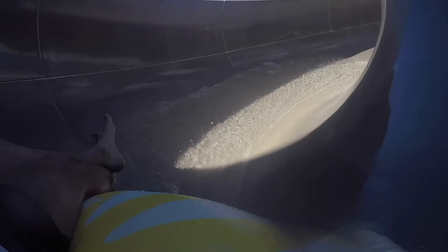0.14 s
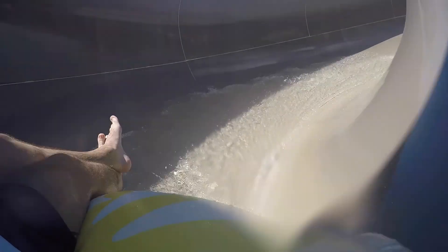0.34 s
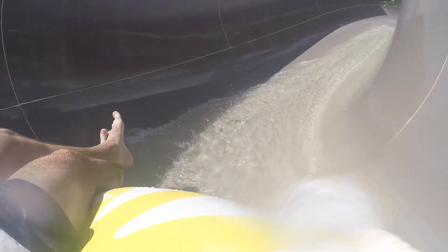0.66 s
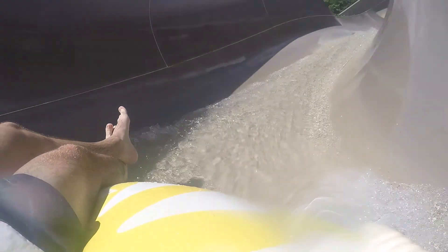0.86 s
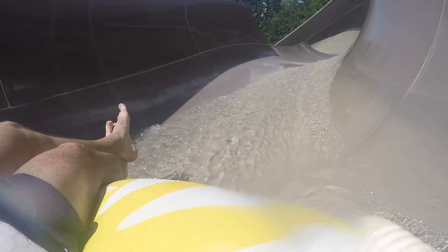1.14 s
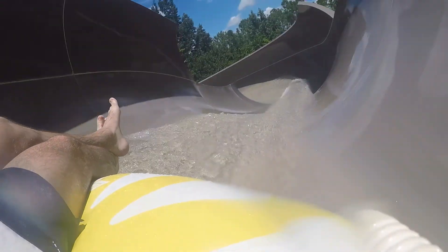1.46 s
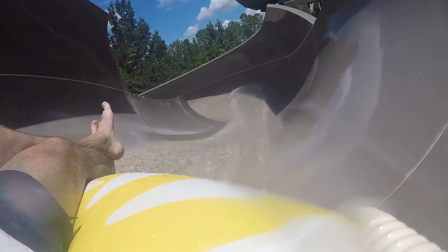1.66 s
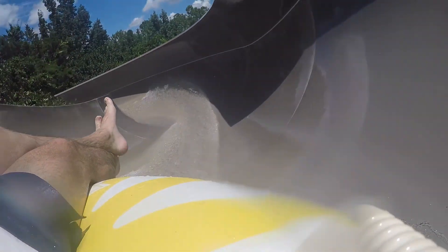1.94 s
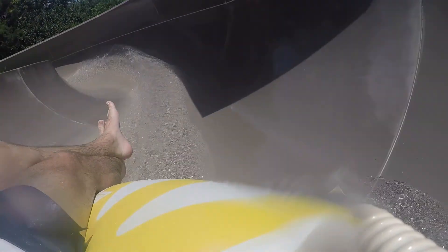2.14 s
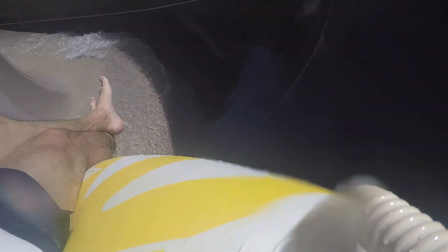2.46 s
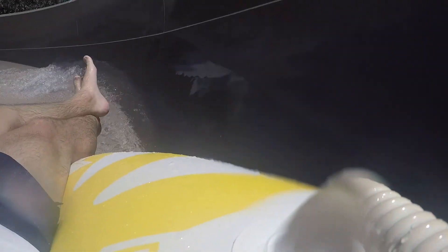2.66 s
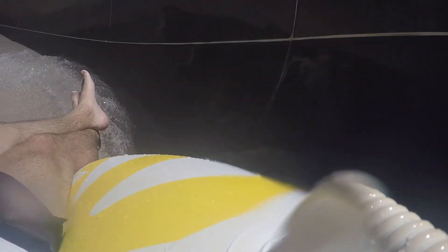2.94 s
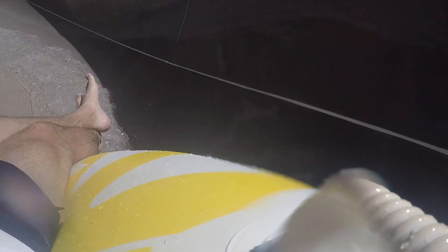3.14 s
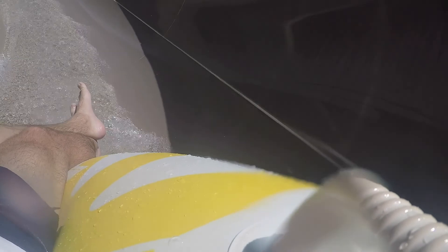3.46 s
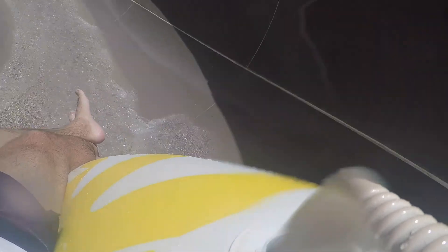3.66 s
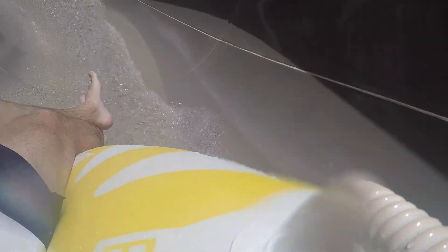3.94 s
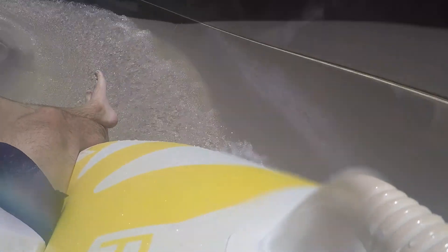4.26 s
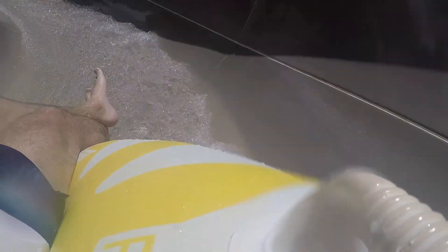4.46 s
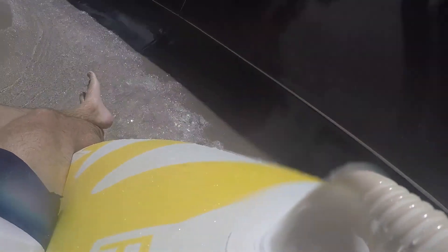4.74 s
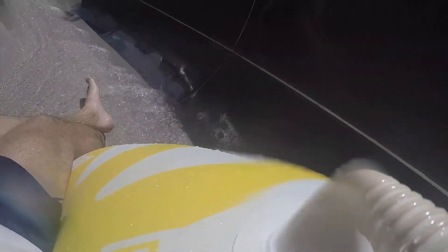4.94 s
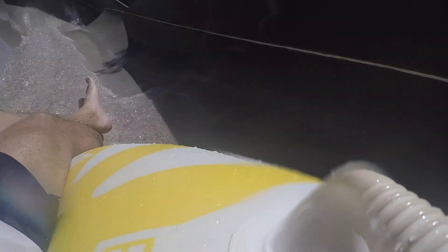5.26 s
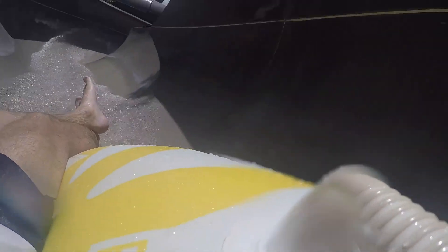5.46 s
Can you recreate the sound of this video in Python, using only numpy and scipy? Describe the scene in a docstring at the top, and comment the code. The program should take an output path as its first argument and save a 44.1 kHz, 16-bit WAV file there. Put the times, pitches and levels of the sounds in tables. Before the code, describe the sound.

Water rushes and splashes close up around an inflatable tube that rumbles and thumps down a water slide.

```python
"""Water rushing down a slide under an inflatable tube, heard close up from a camera riding on board.
Countless droplets and bubbles ring the flume and the waterproof case around the microphone, and the
water churns harder through a banked turn. The tube booms over the joints of the slide and sways after
each. Drops tick against the case, water slaps, and now and then comes a knock or the plop of an air pocket."""
import sys
import numpy as np
from scipy import signal
from scipy.fft import rfft, irfft
from scipy.io import wavfile
from scipy.ndimage import uniform_filter1d

SR = 44100
rng = np.random.default_rng(int(sys.argv[2]) if len(sys.argv) > 2 else 0)


def pcm_store(signal):
    """Save signal as 16-bit PCM."""
    levels = np.round(np.clip(np.atleast_2d(signal), -1, 1) * 32767)
    wavfile.write(sys.argv[1], SR, levels.astype(np.int16).T)


N = 246519
TIME = np.arange(N) / SR
FREQS = np.maximum(np.linspace(0, SR / 2, 8193), 1)

# the tube crossing the joints of the slide: start_s, level_db, start_pitch_hz, fade_s, sway_db
JOINT_BUMPS = [(.389, -24.5, 80, 0.062, -24), (0.848, -24.5, 83, 0.055, -40), (1.331, -23, 83, 0.06, -33.5),
               (2.304, -23, 71, 0.088, -24), (2.589, -19.5, 104, 0.021, -21.5),
               (3.059, -26, 58.7, .04, -14), (3.451, -21, 79, 0.02, -20), (3.527, -23, 92, 0.028, -31),
               (3.883, -24, 101.6, 0.097, -21.5), (4.297, -14.5, 99, 0.039, -23),
               (4.374, -28, 105, 0.012, -25), (4.729, -22.5, 99, 0.034, -25.5),
               (5.216, -15.5, 101, 0.075, -24)]
# resonances of case and flume rung by spray: pitch_hz, width_hz, gain_db
SPRAY_MODES = [(4450, 640, -1), (5720, 780, 5.5), (6260, 330, 3.5), (7340, 1330, -0.5), (8540, 600, -9),
               (11900, 4400, -15.5), (14500, 2700, -24)]
# higher resonances rung by fine mist: pitch_hz, width_hz, gain_db
MIST_MODES = [(7700, 850, -3.5), (8800, 900, -8), (9550, 1000, 0.5), (10400, 670, -5.5), (12500, 1800, -21),
              (14500, 1300, -19)]


def undb(db):
    """Decibels to gain."""
    return 10 ** (np.asarray(db) / 20)


def unit(x):
    """Scale to rms 1."""
    return x / np.sqrt(np.mean(x ** 2))


def add(track, start_s, sound):
    """Mix a sound in at its start time."""
    start = max(int(start_s * SR), 0)
    track[start:start + len(sound)] += sound[:max(N - start, 0)]


def wander(rate_hz):
    """Smooth random drift of rms 1 that changes about rate_hz times a second."""
    size = max(int(SR / rate_hz), 2)
    drift = uniform_filter1d(rng.standard_normal(N), size, mode="wrap")
    return unit(uniform_filter1d(drift, size // 2, mode="wrap"))


def swell(crest_s, level_db, rise_s, fall_s):
    """Power of a swell that builds to its crest and dies away."""
    early, late = np.maximum(crest_s - TIME, 0), np.maximum(TIME - crest_s, 0)
    return (undb(level_db) * np.exp(-(early / rise_s) ** 2 - late / fall_s)) ** 2


def slope(points):
    """Gain at every frequency from points of frequency_hz, gain_db."""
    hz, db = np.transpose(points)
    return undb(np.interp(np.log(FREQS), np.log(hz), db))


def resonances(modes):
    """Gain at every frequency of a set of steep resonances."""
    return np.sqrt(sum(undb(db) ** 2 / (1 + ((FREQS - hz) / width) ** 2) ** 4 for hz, width, db in modes))


def colour(x, gain):
    """Causal filter with the given gain, so that each click rings after it lands."""
    cepstrum, half = irfft(np.log(gain + 1e-9)), len(gain) - 1
    cepstrum[1:half] *= 2
    cepstrum[half + 1:] = 0
    impulse_response = irfft(np.exp(rfft(cepstrum)))[:half]
    return signal.fftconvolve(x, impulse_response)[:N]


def flow():
    """Rush of running water, churn under the tube and fine spray, in dB above their averages."""
    # the water along the ride: time_s, rush_db, churn_db, spray_db
    ride = [(0.0, -36.5, -46.5, -47), (0.04, -38, -44, -53.5), (0.59, -39, -46.5, -53.5),
            (0.98, -42, -48.5, -54.5), (1.09, -45, -48.5, -57), (1.37, -41, -45.5, -58),
            (1.91, -39.5, -46.5, -56.5), (2.29, -39, -40.5, -54.5), (2.32, -35.5, -37, -48),
            (2.35, -40, -44, -52), (2.43, -38, -43.5, -47.5), (2.6, -37.5, -43.5, -50.5),
            (2.85, -39, -41, -50.5), (3.6, -37, -44.5, -51), (3.61, -40, -44.5, -50), (3.94, -41, -47, -52),
            (5.29, -38.5, -46, -50), (5.59, -44, -44.5, -55.5)]
    times, *columns = np.transpose(ride)
    levels = [np.interp(TIME, times, column) for column in columns]
    return [level - level.mean() for level in levels]


def droplets(per_s, spread_db):
    """Dense impacts, mostly small, a few large."""
    lands = rng.random(N) < per_s / SR
    size = undb(spread_db * np.minimum(rng.exponential(size=N), 5))
    return unit(lands * size * rng.choice([-1, 1], N))


def bubbles(low_hz, high_hz, cycles, count):
    """Trapped air rings for some cycles and rises in pitch as it surfaces."""
    out, t = np.zeros(N), TIME[:SR // 50]
    for when, pitch, size in rng.random((count, 3)):
        hz = low_hz * (high_hz / low_hz) ** pitch
        age = t * hz / cycles
        rise = 1 + 0.0097 * np.minimum(age, 5)
        ring = np.exp(-age) * np.sin(2 * np.pi * hz * t * rise)
        add(out, when * N / SR, size ** 2 * ring)
    return unit(out)


def gurgle(low_hz, high_hz, cycles, count):
    """Running water: countless small impacts and a crowd of bubbles."""
    return droplets(per_s=30000, spread_db=.8) + .21 * bubbles(low_hz, high_hz, cycles, count)


def spatter(per_s, depth, fade_s):
    """Fine droplets come in spits, which start at once and die away."""
    spits = (rng.random(N) < per_s / SR) * rng.random(N) ** 2
    grains = droplets(per_s=7000, spread_db=2.8) + rng.standard_normal(N)
    envelope = signal.lfilter([1], [1, -np.exp(-1 / (fade_s * SR))], spits)
    return grains * (1 + depth * envelope)


def stream(source, modes, surge_db):
    """Water arrives in quick uneven surges and rings the case and flume."""
    surge = unit(wander(24) + 2 * wander(130))
    return unit(colour(source * undb(surge_db * surge), resonances(modes)))


def water():
    """The running sheet, the wash on the wall, churn, spray, mist and foam, over the flume's hiss."""
    # resonances of case and flume rung by each kind of water: pitch_hz, width_hz, gain_db
    sheet_modes = [(945, 256, -4.5), (1384, 74, -2), (1710, 330, -2), (2610, 130, -7), (2675, 436, 6),
                   (3115, 394, 3), (3922, 310, -1), (4530, 495, -12.5)]
    wash_modes = [(802, 446, -13), (1564, 270, -5.5), (2120, 240, -5.5), (2461, 294, 2), (2880, 360, -7.5),
                  (3180, 120, -8), (3790, 670, -8), (4550, 630, -16)]
    churn_modes = [(292, 470, -7), (665, 780, -8), (1080, 310, -5.5), (1436, 297, 5.5), (1800, 487, 3.5)]
    foam_modes = [(3870, 790, 10.5), (4980, 1900, 5), (7140, 1400, -3), (11500, 3000, -18)]
    # foam thrown up beside the microphone on the straight: crest_s, level_db, rise_s, fall_s
    foam_swells = [(.03, -46, 0.071, 0.57), (.99, -49, .25, 0.14), (1.4, -53.5, 0.23, .3)]
    # broad hiss of the whole flume: frequency_hz, gain_db
    hiss_spectrum = [(100, -7), (300, -3), (500, -3.5), (750, -1), (1200, 1), (1700, -7), (2150, -9),
                     (3500, -6.5), (7000, -10.5), (15000, -26.5)]
    sheet = stream(gurgle(751, 4243, cycles=7.7, count=2500), sheet_modes, surge_db=0.5)
    wash = stream(gurgle(1991, 4225, cycles=20, count=2500), wash_modes, surge_db=1.07)
    churn = stream(gurgle(612, 2282, cycles=12.4, count=1500), churn_modes, surge_db=1.2)
    spray = stream(spatter(per_s=50, depth=0.95, fade_s=0.0048), SPRAY_MODES, surge_db=1.5)
    mist = stream(spatter(per_s=35, depth=2.8, fade_s=0.0052), MIST_MODES, surge_db=0.8)
    foam = stream(spatter(per_s=57, depth=1.8, fade_s=0.0085), foam_modes, surge_db=3.5)
    hiss = unit(colour(rng.standard_normal(N), slope(hiss_spectrum)))

    rush_db, churn_db, spray_db = flow()
    bank_s, climb_s = 2.2, 0.12
    on_straight = .5 - .5 * np.tanh((TIME - bank_s) / climb_s)
    out = undb(-40 + 0.71 * rush_db) * sheet
    out += undb(-41 + 0.62 * rush_db - 8 * on_straight) * wash  # builds as the tube climbs the bank
    out += undb(-46.5 + 1.3 * churn_db) * churn
    out += undb(-55.5 + spray_db) * spray
    out += undb(-61.5 + spray_db + 0.44 * churn_db) * mist  # harder churning tears spray into mist
    out += np.sqrt(sum(swell(*row) for row in foam_swells)) * foam
    return out + undb(-50.5 + 0.52 * rush_db) * hiss


def wobble():
    """Reach of the air cushion's swing in dB: stirred by the churn, swayed by bumps, heaved by waves."""
    # waves that heave the tube without a thud: crest_s, level_db
    heaves = [(.02, -19), (.13, -26), (.6, -28), (2.23, -24.5), (2.49, -23), (2.92, -19.5), (3.3, -18.5),
              (4.17, -25.5), (4.91, -25), (5.4, -20.5)]
    _, churn_db, _ = flow()
    ebb_db, sway_lag_s = 2.5, 0.1
    power = undb(-33.5 + 0.57 * churn_db + ebb_db * wander(11)) ** 2
    for start_s, *_, sway_db in JOINT_BUMPS:
        power += swell(start_s + sway_lag_s, sway_db, rise_s=0.093, fall_s=0.095)
    for crest_s, level_db in heaves:
        power += swell(crest_s, level_db, rise_s=.025, fall_s=0.059)
    return 10 * np.log10(power)


def tube():
    """The cushion wobbles and drags; each bump scuffs the slide and booms, sinking as the skin relaxes."""
    # spectra of the tube's wobble and of its skin dragging on the slide: frequency_hz, gain_db
    wobble_spectrum = [(8, -23.5), (18, 4.5), (27, 5), (38, -2.5), (50, -8), (75, -21), (110, -32),
                       (200, -47.5), (500, -69), (4000, -130)]
    drag_spectrum = [(20, -12.5), (60, 0), (100, -6), (160, -12), (280, -22.5), (500, -40), (1200, -45),
                     (8000, -100)]
    wobble_db = wobble()
    body = signal.hilbert(colour(rng.standard_normal(N), slope(wobble_spectrum)))
    # the heavy cushion swings at an uneven pace but with a steady reach
    reach = np.sqrt(uniform_filter1d(np.abs(body) ** 2, SR // 16))
    out = undb(wobble_db) * unit(body.real / reach)
    friction = rng.standard_normal(N) * undb(2.14 * wander(15))
    drag = unit(colour(friction, slope(drag_spectrum)))
    pressure = undb(-47.5 + 0.17 * (wobble_db - wobble_db.mean()))
    t, rest_hz, relax_s = TIME[:SR // 2], 30, .031
    for start_s, level_db, start_pitch_hz, fade_s, _ in JOINT_BUMPS:
        pitch_hz = rest_hz + (start_pitch_hz - rest_hz) * np.exp(-t / relax_s)
        envelope = (1 - np.exp(-t / 0.0064)) * np.exp(-t / fade_s)
        boom = envelope * np.sin(2 * np.pi * np.cumsum(pitch_hz) / SR)
        scuff = (1 - np.exp(-t / 0.017)) * np.exp(-t / 0.12)
        add(out, start_s, undb(level_db + 0.5) * boom)
        add(pressure, start_s - .015, undb(level_db - 28.5) * scuff)
    return out + pressure * drag


def drops():
    """A drop bursts on the case, right at the microphone: a short crack, brightest around one pitch."""
    # drops hitting the case: start_s, relative_level_db, pitch_hz
    hits = [(0.125, -30, 5600), (0.2025, -33, 5200), (0.8, -30, 5500), (1.284, -27, 9700), (1.4, -35, 5400),
            (2.028, -29, 7600), (2.261, -33, 5900), (2.447, -41, 5940), (2.513, -34, 9760),
            (3.074, -27.5, 5860), (3.361, -17, 9700), (3.618, -28, 7400), (4.596, -23, 13700),
            (4.732, -35, 9900)]
    out, t, fade_s = np.zeros(N), TIME[:SR // 25], 0.0028
    for start_s, level_db, pitch_hz in hits:
        crack = rng.standard_normal(len(t))
        ring = unit(signal.lfilter(*signal.iirpeak(pitch_hz, Q=5, fs=SR), crack))
        add(out, start_s, undb(level_db - 4.5) * ring * np.exp(-t / fade_s))
    return colour(out, slope([(500, -8), (3000, 5), (5500, -2), (10000, -18.5), (15000, -21)]))


def slaps():
    """Each slap of water is a hollow burst around its own pitch, with a shower of spray."""
    # slaps of water: start_s, level_db, length_s, pitch_hz, relative_spray_db
    splashes = [(0.56, -36.5, 0.017, 2720, -15), (0.79, -42.5, .018, 4400, -7),
                (2.005, -36, 0.017, 1760, -13.5), (2.178, -39, .015, 1130, -15),
                (2.311, -34, .011, 1440, -9), (2.418, -38, 0.021, 1180, -9.5),
                (2.496, -36, 0.013, 2380, -7.5), (2.717, -34, .022, 1730, -11),
                (2.798, -31, 0.02, 1810, -21), (2.894, -35, 0.017, 1800, -16),
                (3.031, -35, 0.021, 1570, -22), (3.119, -39, .008, 3800, -12),
                (4.72, -37, 0.017, 2600, -15), (5.369, -37.5, 0.041, 2840, -11.5)]
    # resonances rung by a slap: pitch_hz, width_hz, gain_db
    slap_modes = [(1040, 320, -6.5), (1500, 260, -4), (1930, 450, -6), (2410, 290, 1), (3070, 330, 1),
                  (3880, 295, -0.5)]
    hollow = unit(colour(rng.standard_normal(N), resonances(slap_modes)))
    bright = unit(colour(rng.standard_normal(N), resonances(SPRAY_MODES + MIST_MODES)))
    out = np.zeros(N)
    for start_s, level_db, length_s, pitch_hz, spray_db in splashes:
        start = int(start_s * SR)
        part = slice(start, start + SR // 5)
        burst = unit(signal.lfilter(*signal.iirpeak(pitch_hz, Q=1.8, fs=SR), hollow[part]))
        shower = undb(spray_db - 2) * bright[part]
        age = TIME[:len(burst)] / length_s
        envelope = 2 * age * np.exp(1 - 2 * age)
        add(out, start_s, undb(level_db) * envelope * (burst + shower))
    return out


def knocks():
    """Single damped rings of the case and of large air pockets."""
    # knocks and plops: start_s, level_db, pitch_hz, t60_s
    rings = [(1.140, -38.5, 250, 0.11), (1.602, -27.5, 3070, .025), (2.297, -26, 228, 0.044),
             (2.587, -22.5, 237, 0.022), (3.184, -23, 2750, .03), (4.101, -23.5, 2340, 0.019),
             (5.104, -29, 843, 0.048)]
    out, t = np.zeros(N), TIME[:SR // 4]
    for start_s, level_db, pitch_hz, t60_s in rings:
        envelope = (1 - np.exp(-t * pitch_hz)) * np.exp(-np.log(1000) * t / t60_s)
        add(out, start_s, undb(level_db) * envelope * np.sin(2 * np.pi * pitch_hz * t))
    return out


def scene():
    """Water and tube as they reach the microphone on board, in mono."""
    return (water() + slaps() + drops() + knocks() + tube())[None]


def record(dry):
    """The camera cuts the top of the treble steeply."""
    top_hz = 15100
    return signal.sosfilt(signal.ellip(10, .2, 80, top_hz, fs=SR, output="sos"), dry)


dry = scene()
out = record(dry)
pcm_store(out)
```